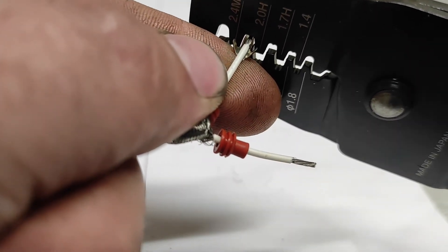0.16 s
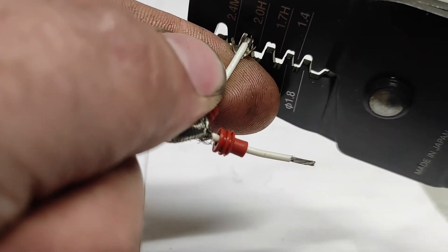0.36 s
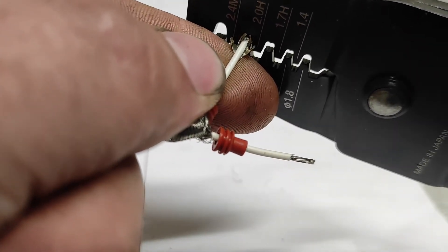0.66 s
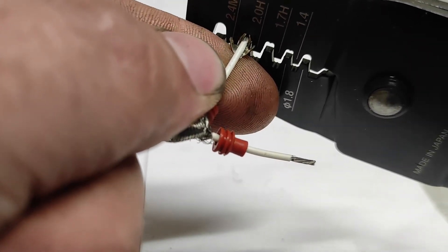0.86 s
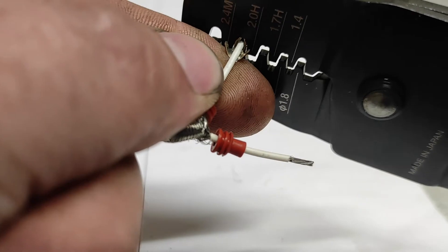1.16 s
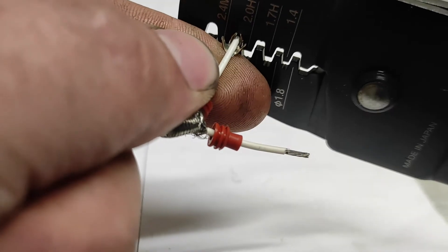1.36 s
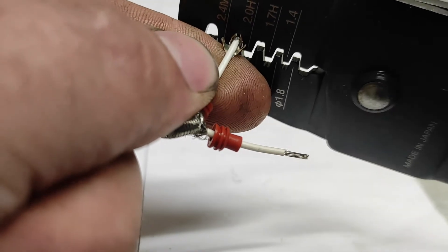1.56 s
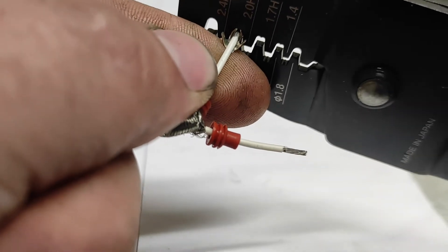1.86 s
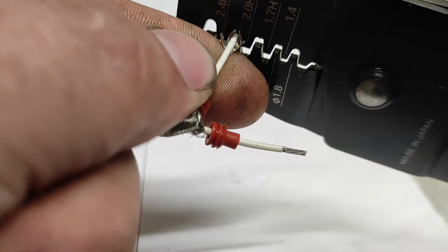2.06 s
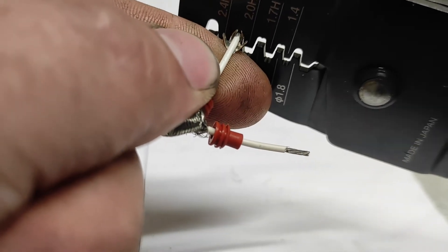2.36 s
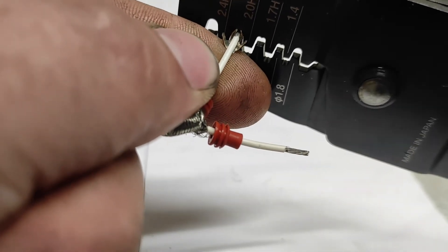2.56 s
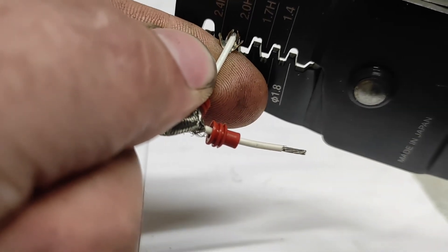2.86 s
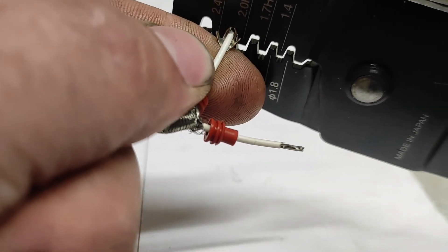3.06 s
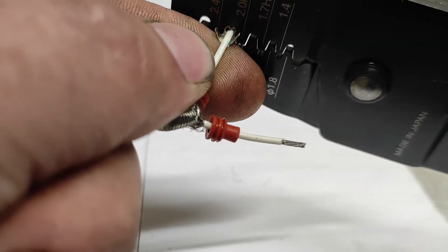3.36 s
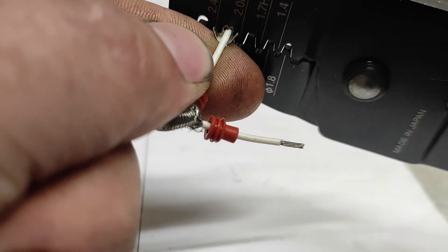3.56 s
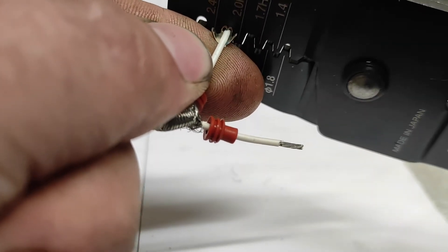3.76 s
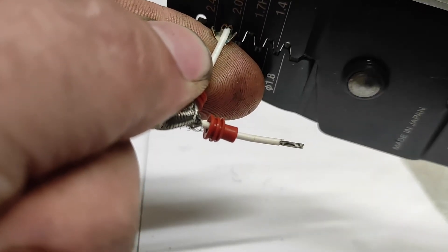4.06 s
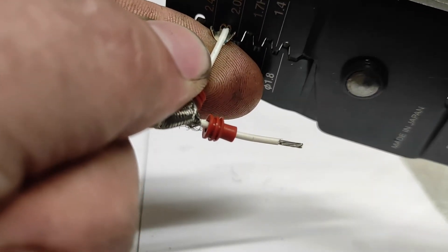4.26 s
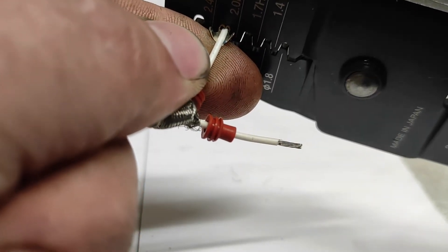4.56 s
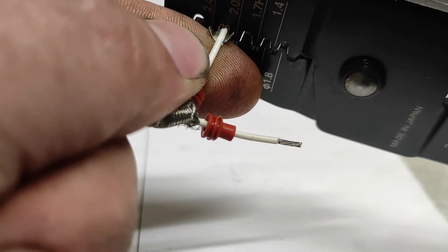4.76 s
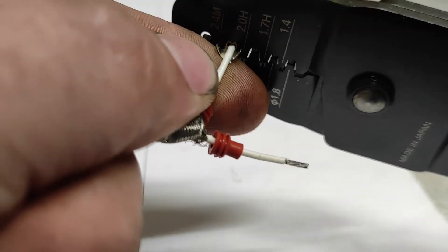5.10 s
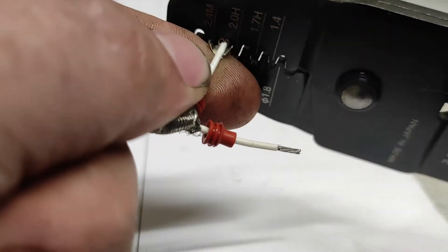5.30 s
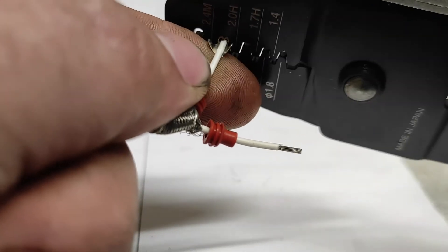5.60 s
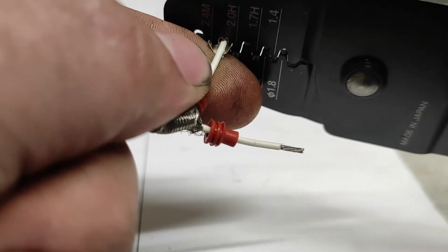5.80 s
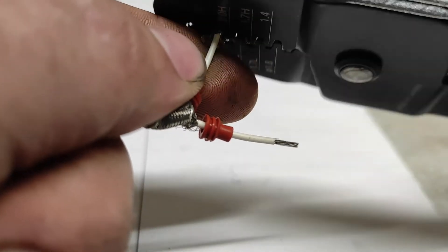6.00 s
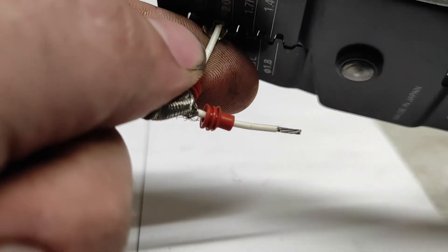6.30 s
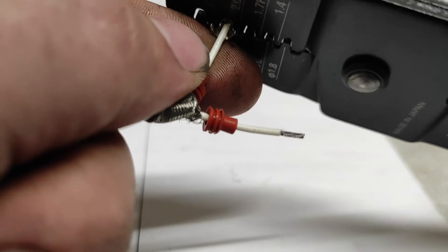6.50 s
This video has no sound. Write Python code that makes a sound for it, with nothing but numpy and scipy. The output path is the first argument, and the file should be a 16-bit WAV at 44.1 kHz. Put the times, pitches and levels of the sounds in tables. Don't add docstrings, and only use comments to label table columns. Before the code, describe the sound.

Quiet workshop bench, heard by a phone very near the tool. Light clicks while the metal jaws are positioned, a near-silent wait, then a single hard crack of jaws meeting, much louder than everything else. Soft ticks and hand drags follow; later sharper clicks and skin rubbing on grips. Mains hum, engine drone and muffled traffic lie behind, rising late. Bench vibrations lean left.

```python
import sys
import numpy as np
from scipy import signal
from scipy.fft import rfft, irfft, next_fast_len
from scipy.io import wavfile
from scipy.ndimage import uniform_filter1d, map_coordinates

SR = 44100
rng = np.random.default_rng(int(sys.argv[2]) if len(sys.argv) > 2 else 0)


def dump(signal):
    limited = np.clip(np.atleast_2d(signal).T, -1, 1)
    pcm = np.round(limited * 32767).astype(np.int16)
    wavfile.write(sys.argv[1], SR, pcm)


def voltage_ratio(level):
    return 10 ** (np.asarray(level, float) / 20)


N = 292824

# (time [s], level [dB], left-right [dB])
SNAP_BLOWS = [
    (3.1307, -13.5, 1.5),
    (3.1320, -12, 1),
    (3.1339, -13.5, 4),
]
# (frequency [Hz], level [dB], t60 [s])
STEEL_MODES = [(1520, -10.5, 0.11), (2100, -12.5, 0.15), (2690, -19.5, 0.24), (3742, -9.5, 0.18),
               (4145, -12, 0.13), (4484, -9, 0.1), (4662, -9, 0.11), (5367, -6.5, 0.073), (6019, -22, 0.18),
               (6401, -2, 0.061), (6380, -9.5, 0.13), (6826, -3.5, 0.062), (8387, -14, 0.14),
               (9300, -16, 0.12)]
# (frequency [Hz], width [Hz], level [dB])
JAW_RESONANCES = [(1160, 540, 0), (1690, 250, 4), (2050, 750, -4), (2620, 220, 2.5), (3685, 270, 0),
                  (4320, 210, 1), (4490, 250, -0.5), (5520, 350, -1.5), (6500, 200, -4), (6934, 370, -0.5),
                  (7270, 230, -2), (8810, 595, -4)]
# (frequency [Hz], level [dB], t60 [s])
BENCH_MODES = [(135.6, -15, 0.3), (165, -6, 0.77), (186, -6, 0.45), (250, -10.5, 0.33), (334.5, -9, 0.18),
               (385, -4.5, 0.16), (470, -12, 0.087)]
# (frequency [Hz], level [dB], t60 [s])
HOUSING_MODES = [(713, 0, 0.055), (800, -4.5, 0.049), (1065, -2, 0.057), (1530, -6, .03)]
# (frequency [Hz], level [dB], t60 [s])
STAND_ROCK = [(51.7, 0.0019, 0.2304)]
HOUSING_CLACK = [(1269.4, -2.5, 0.018)]
BENCH_PUSH = [(243, 0.5, 0.045), (178.3, -4.5, 0.11), (49.75, -16, 0.2)]
# (time [s], bright peak [dB], middle pitch [Hz],
# middle over peak [dB], knock into the stand over peak [dB])
PLACING = [(0.3322, -56.5, 2250, -6.5, -2.5), (0.409, -46.5, 1490, -12.5, -6.5),
           (0.8643, -40, 1450, -18.5, -8), (1.0517, -66, 3000, -21, -15), (1.0620, -41, 1500, -12.5, -10),
           (1.1384, -53, 2200, -21, -7), (1.1732, -47.5, 1700, -12.5, -2), (1.2049, -62, 2000, -5, -5),
           (1.2150, -54, 1600, -11, -4.5), (1.2764, -58, 1900, -16, -9), (1.3277, -53.5, 2000, -15, -16),
           (1.5471, -40, 1520, -14.5, -36), (1.8701, -54.5, 2000, -14.5, -4.5),
           (2.5444, -59, 1900, -11.5, -13)]
# (time [s], bright peak [dB], middle pitch [Hz],
# middle over peak [dB], knock over peak [dB])
SQUEEZING = [(3.091, -59.5, 1890, -20, -14.5), (3.222, -70, 1500, -12, 17), (3.2919, -46, 1500, -19.5, -14),
             (3.5340, -65, 2470, -1.5, 5), (3.8023, -54, 5600, -15, 5.5), (4.1365, -53, 2400, -5.5, 7),
             (4.2612, -53, 2400, -9, -11)]
# (time [s], bright peak [dB], middle pitch [Hz],
# middle over peak [dB], knock over peak [dB])
OPENING = [(5.0684, -46.5, 1500, -18.5, -15), (5.1851, -57, 1900, -15, -6), (5.2121, -56, 1900, -17, -21),
           (5.277, -53, 1900, -16, -12), (5.293, -40, 2500, -16, -15.5), (5.323, -41.5, 2500, -5, -13),
           (5.3268, -26.5, 1900, -6.5, -20), (5.434, -47, 2970, -19, -22), (5.5423, -45, 2000, -14.5, -22),
           (5.551, -47.5, 5000, -21, -25), (5.5597, -32.5, 4960, -17.5, -28),
           (5.683, -41.5, 2320, -13, -18), (5.9386, -55, 1900, -14, 3), (6.4715, -43.5, 4700, -11.5, -22),
           (6.5776, -24, 2190, -31.5, -32)]
# (time [s], pitch [Hz], peak level [dB])
BUMPS = [(0.412, 149.5, -42), (0.886, 145, -53), (1.085, 150, -54.5), (1.19, 169, -54), (1.435, 165, -53.5),
         (1.88, 174.6, -56), (3.294, 176, -54.5), (3.66, 250.4, -56.5), (4.459, 260, -57.5),
         (5.168, 155, -56), (5.342, 170, -46.5), (6.587, 164, -52.5)]
# (pitch ratio, level [dB], t60 [s])
BUMP_SWING = [(1.43, 1, .07), (1.12, -4.5, .2), (1, -1.5, 0.29)]
# (time of peak [s], length [s], level [dB])
RUB_STROKES = [(1.245, 0.064, -60.5), (1.37, 0.037, -72.5), (1.905, 0.093, -63), (3.65, 0.22, -77.5),
               (3.77, 0.16, -75), (5.12, 0.27, -75.5), (5.35, 0.29, -71), (5.52, 0.23, -75),
               (5.83, 0.068, -68.5), (5.97, 0.069, -61), (6.05, .14, -57.5), (6.26, 0.26, -63),
               (6.46, 0.19, -66.5), (6.64, 0.17, -72)]
# (frequency [Hz], level per Hz [dB])
SKIN_SPECTRUM = [(200, -30), (400, 1), (1500, -7.5), (3000, -5), (5000, -2.5), (7000, -3), (9000, -1),
                 (10000, -12), (15500, 0.5)]
# (time of peak [s], length [s], level [dB])
DRAG_STROKES = [(1.25, .06, -65), (1.9, 0.09, -68.5), (3.7, 0.084, -61), (4.46, 0.13, -66.5),
                (6.02, 0.11, -58.5), (6.32, 0.53, -67.5), (6.55, 0.74, -60)]
# (frequency [Hz], level per Hz [dB])
DRAG_SPECTRUM = [(100, -40.5), (200, 4), (600, -3.5), (1500, -2), (2800, -13.5), (5000, -54)]
# (time of peak [s], length [s], level [dB], frequency [Hz])
HINGE_SQUEAK = (0, .03, -82, 6450)
# (frequency [Hz], width [Hz], level [dB])
PORT_CAVITIES = [(8400, 430, 9.5), (7060, 1200, 12)]
# (frequency [Hz], t60 [s])
GARAGE_DECAY = [(200, .4), (1000, 0.16), (4000, 0.16), (10000, 0.15)]
# (time [s], level [dB])
STREET_LEVEL = [(0.0, -75), (0.81, -76.5), (1.29, -69), (1.55, -72.5), (2.14, -72), (3.81, -66),
                (4.99, -64.5), (5.21, -63), (5.69, -61), (6.16, -55), (6.64, -59.5)]
# (frequency [Hz], level per Hz [dB])
TRAFFIC_SPECTRUM = [(65, -28.5), (110, -0.5), (124, -14), (175, -7), (210, -12), (279, 0.5), (340, -6.5),
                    (377, -8), (575, -12.5), (689, -4.5), (850, -15), (1080, -9), (4000, -30.5),
                    (5200, -61.5), (8800, -120)]
# (time of peak [s], length [s], level [dB])
ENGINES = [(1.3, 0.44, -70), (3.05, 0.65, -65.5), (4.08, 0.46, -59), (4.45, 0.28, -59), (5.27, 0.44, -57.5),
           (5.95, .3, -59.5), (6.38, 0.37, -53.5)]
# (frequency [Hz], level per Hz [dB])
DRONE_SPECTRUM = [(30, -120), (45, -30.5), (56, -6.5), (63, -0.5), (72, -8), (90, -30), (150, -120)]
# (time of peak [s], length [s], level [dB])
SHAKES = [(3.3, 0.44, -58), (4.8, .3, -60.5), (5.3, 0.55, -64), (5.9, 0.44, -61)]
# (frequency [Hz], level per Hz [dB])
RUMBLE_SPECTRUM = [(4, -39.5), (20, -0.5), (45, -6.5), (60, -10.5), (90, -30.5), (150, -120)]
# (frequency [Hz], level [dB rms])
HUM = (100, -62)
# (frequency [Hz], level per Hz [dB])
ROOM_SPECTRUM = [(68, -29.5), (115, -1), (125, -13.5), (157, -7.5), (228, -14.5), (295, -13), (591, -18.5),
                 (660, -18.5), (716, -25.5), (3000, -35), (3900, -67.5), (6600, -120)]
# (frequency [Hz], level per Hz [dB])
HISS_SPECTRUM = [(1470, -29), (2500, -1.5), (3180, -6.5), (3410, -5), (5030, -5), (7360, 0), (12200, -16.5),
                 (12900, -14.5), (13300, -27.5), (16000, -29)]
# (frequency [Hz], correlation)
CHANNEL_LIKENESS = [(60, 0.79), (240, 0.83), (950, 0.04), (3770, -0.01), (15000, -0.31)]
# (frequency [Hz], left-right [dB])
CHANNEL_LEAN = [(60, 5), (180, 7), (550, 5.0), (1650, 3.5), (4970, -2.5), (15000, 2.0)]

CLICK, KNOCK, STRIKE, THUMP = 900, 4400, 5500, 9000
TICK_TAIL, SNAP_TAIL, WALL_GAP = 6600, 15000, 90
FRAME, PAD = 128, 8192


def unit(x):
    return x / np.sqrt(np.mean(x ** 2) + 1e-20)


def along(points, hz):
    f, value = np.transpose(points)
    return np.interp(np.log(hz + 1), np.log(f + 1), value)


def wobble(rate):
    return map_coordinates(rng.standard_normal(PAD), [np.arange(N) * rate / SR])


def filtered(x, response):
    m = next_fast_len(x.shape[-1] + PAD)
    spectrum = rfft(x, m) * response(np.fft.rfftfreq(m, 1 / SR))
    return irfft(spectrum, m)[..., :x.shape[-1]]


def peak(f, hz, width_hz):
    return 1j * f * width_hz / (hz * hz - f * f + 1j * f * width_hz)


def sides(lean_db):
    return voltage_ratio(np.array([lean_db / 2, -lean_db / 2]))


def add(track, s, piece):
    track[..., round(s * SR):][..., :piece.shape[-1]] += piece


def swells(rows, fade_db, lead, power):
    t = np.arange(0, N, FRAME) / SR
    s, length, db = np.transpose(rows)[:, :, None]
    away = np.abs(t - s) / length / np.where(t < s, lead, 1)
    gain = np.sqrt((voltage_ratio(db - fade_db * away ** power) ** 2).sum(0))
    return np.interp(np.arange(N) / SR, t, gain)


def rush(spectrum):
    hz = np.fft.rfftfreq(N, 1 / SR)
    turn = np.arccos(np.clip(along(CHANNEL_LIKENESS, hz), -1, 1)) / 2
    noise = rfft(rng.standard_normal((2, N))) * voltage_ratio(along(spectrum, hz))
    mid, side = noise * [np.cos(turn), np.sin(turn)]
    return unit(irfft([mid + side, mid - side] * sides(along(CHANNEL_LEAN, hz)), N))


def ring(modes, t, scatter_db, attack, damping=1):
    hz, db, t60 = np.transpose(modes)[:, :, None]
    struck_db = db + scatter_db * rng.standard_normal(db.shape)
    level = voltage_ratio(struck_db - 60 * damping * np.abs(t) / t60)
    swing = (level * np.sin(2 * np.pi * hz * t)).sum(0)
    return swing * (t > 0) * (1 - np.exp(-np.abs(t) / attack))


def felt(modes, t, lean_db, lag, scatter_db, attack, damping=1):
    both = [ring(modes, u, scatter_db, attack, damping) for u in (t, t - lag)]
    return sides(lean_db)[:, None] * both


def jaws(f, between):
    body = sum((-1) ** k * voltage_ratio(db) * peak(f, hz, w) for k, (hz, w, db) in enumerate(JAW_RESONANCES))
    return between + body


def burst(t, rise, fall, hz, width_hz, between):
    noise = rng.standard_normal((2, len(t))) * (1 - np.exp(-t / rise)) * np.exp(-t / fall)
    z = rfft(noise, PAD)
    even = irfft(z / np.sqrt(uniform_filter1d(np.abs(z) ** 2, size=60)), PAD)[:, :len(t)]
    x = filtered(even, lambda f: peak(f, hz, width_hz) ** 2 * jaws(f, between))
    return x / np.abs(x).max(1, keepdims=True)


def garage(x, size):
    hz, t, z = signal.stft(rng.standard_normal((2, size)), SR, nperseg=FRAME)
    decay = voltage_ratio(-60 * t / along(GARAGE_DECAY, hz)[:, None])
    tail = signal.istft(z * decay, SR, nperseg=FRAME)[1]
    delayed = np.pad(x, ((0, 0), (WALL_GAP, 0)))
    return signal.fftconvolve(delayed, tail / np.linalg.norm(tail[0]), axes=1)


def ports(x):
    def response(f):
        cavity = np.array([1 + voltage_ratio(db) * peak(f, hz, w) for hz, w, db in PORT_CAVITIES])
        return cavity * (voltage_ratio(-23.5) + (1 + (f / 9500) ** 8) ** -0.65)
    return filtered(x, response)


def snap_in_air():
    air, t = np.zeros((2, SR)), np.arange(STRIKE) / SR
    for s, db, lean_db in SNAP_BLOWS:
        steel = np.array([ring(STEEL_MODES, t, scatter_db=5.5, attack=0.00018, damping=3.5) for _ in "LR"])
        chatter = burst(t, rise=0.0002, fall=0.00064, hz=3330, width_hz=8700, between=0.15)
        blow = voltage_ratio(db) * sides(lean_db)[:, None] * (voltage_ratio(-21) * steel + voltage_ratio(3) * chatter)
        after = s - SNAP_BLOWS[0][0]
        add(air, after, blow)
        add(air, after, voltage_ratio(-12) * garage(blow, SNAP_TAIL))
    return ports(air)


def snap_in_bench():
    t = np.arange(SR // 2) / SR
    rock = felt(STAND_ROCK, t - 0.01, lean_db=5, lag=0, scatter_db=-1, attack=0.012)
    housing = felt(HOUSING_MODES, t - 0.003, lean_db=4, lag=0.00044, scatter_db=-0.5, attack=0.0013)
    clack = felt(HOUSING_CLACK, t, lean_db=9, lag=0.00017, scatter_db=0.5, attack=0.0005)
    thump = felt(BENCH_MODES, t - 0.024, lean_db=9, lag=0.0014, scatter_db=-1, attack=0.0013)
    thump = thump / (1 + np.exp((t - 0.2) / 0.012))
    push = felt(BENCH_PUSH, t - 0.0055, lean_db=20.5, lag=0.0015, scatter_db=-1, attack=0.0014)
    return (voltage_ratio(-32) * rock + voltage_ratio(-20) * housing + voltage_ratio(-13.5) * clack
            + voltage_ratio(-30.5) * thump + voltage_ratio(-18) * push)


def snap():
    both = snap_in_air()
    add(both, 0, snap_in_bench())
    out = np.zeros((2, N))
    add(out, SNAP_BLOWS[0][0], both)
    return out


def ticks(contacts, lean_db, bench_db):
    air, solid = np.zeros((2, N + SR)), np.zeros((2, N + SR))
    t = np.arange(THUMP) / SR
    upper_bench = BENCH_MODES[4:]
    for s, db, middle_hz, middle_db, knock_db in contacts:
        bright = burst(t[:CLICK], rise=0.0006, fall=0.0013, hz=9500, width_hz=6500, between=1.3)
        middle = burst(t[:CLICK], rise=0.0009, fall=0.0014, hz=middle_hz, width_hz=2400, between=1.4)
        place = sides(lean_db + 0.5 * rng.standard_normal())[:, None]
        click = voltage_ratio(db) * place * (voltage_ratio(-1.5) * bright + voltage_ratio(middle_db + 11.5) * middle)
        add(air, s, click)
        add(air, s, voltage_ratio(-11) * garage(click, TICK_TAIL))
        knock = felt(HOUSING_MODES, t[:KNOCK] - 0.003, lean_db=3.5, lag=0.00036, scatter_db=2.5, attack=0.0012)
        add(solid, s, voltage_ratio(db + knock_db + 5.5) * knock)
        thump = felt(upper_bench, t - 0.002, lean_db=9, lag=0.0012, scatter_db=4, attack=0.0016, damping=2.1)
        add(solid, s, voltage_ratio(db + knock_db + bench_db + 4) * thump)
    return ports(air[:, :N]) + solid[:, :N]


def handling():
    placing = ticks(PLACING, lean_db=1.5, bench_db=7.5)
    squeezing = ticks(SQUEEZING, lean_db=1.492, bench_db=-11)
    opening = ticks(OPENING, lean_db=1.7, bench_db=-6)
    return placing + squeezing + opening


def bumps():
    solid, t = np.zeros((2, N + SR)), np.arange(THUMP) / SR
    for s, hz, db in BUMPS:
        modes = np.multiply(BUMP_SWING, (hz, 1, 1))
        bump = felt(modes, t, lean_db=8.5, lag=0.0012, scatter_db=1.5, attack=0.0019)
        add(solid, s, voltage_ratio(db + 1.5) * bump)
    return solid[:, :N]


def stroke(rows):
    return swells(rows, fade_db=19, lead=0.88, power=1.14)


def fingers():
    unevenness_db = 2.54 * wobble(400) + 0.79 * wobble(60) + 1.3 * wobble(25)
    grains = rng.standard_normal((2, N)) * voltage_ratio(unevenness_db)
    skin = unit(ports(filtered(grains, lambda hz: voltage_ratio(along(SKIN_SPECTRUM, hz)))))
    return stroke(RUB_STROKES) * voltage_ratio(4) * skin


def hand_drag():
    def stand(f):
        return 1 + sum(1.2 * voltage_ratio(db) * peak(f, hz, 70) for hz, db, _ in HOUSING_MODES)
    drag = unit(filtered(rush(DRAG_SPECTRUM), stand))
    return stroke(DRAG_STROKES) * voltage_ratio(3.8 * wobble(97)) * drag


def hinge():
    *swell, hz = HINGE_SQUEAK
    phase = 2 * np.pi * hz * np.arange(N) / SR + 1.2 * wobble(150)
    return stroke([swell]) * np.sin(phase)


def traffic():
    s, db = np.transpose(STREET_LEVEL)
    level_db = np.interp(np.arange(N) / SR, s, db)
    return voltage_ratio(level_db + 2.5 + 1.2 * wobble(8)) * rush(TRAFFIC_SPECTRUM)


def passing(rows, steady_db):
    return np.hypot(voltage_ratio(steady_db), swells(rows, fade_db=13, lead=0.81, power=1.4))


def engine_drone():
    phase = 2 * np.pi * 63.5 * np.arange(N) / SR + 2.2 * wobble(3)
    note = np.sin(phase) * sides(5)[:, None]
    drone = 0.38 * rush(DRONE_SPECTRUM) + 1.2 * note
    return voltage_ratio(3) * passing(ENGINES, steady_db=-77) * drone


def floor_rumble():
    return voltage_ratio(5.5) * passing(SHAKES, steady_db=-68) * rush(RUMBLE_SPECTRUM)


def mains_hum():
    hz, db = HUM
    tone = np.sin(2 * np.pi * hz * np.arange(N) / SR)
    return voltage_ratio(db + 2.5 + 0.49 * wobble(6.8)) * tone * sides(4.6)[:, None]


def room_and_hiss():
    return voltage_ratio(-67.5) * rush(ROOM_SPECTRUM) + voltage_ratio(-76.5) * rush(HISS_SPECTRUM)


def scene():
    near = snap() + handling() + bumps() + fingers() + hand_drag() + hinge()
    behind = traffic() + engine_drone() + floor_rumble() + mains_hum() + room_and_hiss()
    return near + behind


def top_cut(x):
    return signal.sosfilt(signal.butter(12, 16420, fs=SR, output="sos"), x)


def record(dry):
    return top_cut(dry)


dry = scene()
out = record(dry)
dump(out)
```